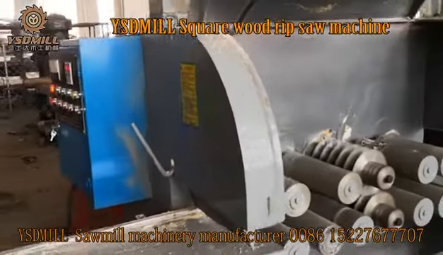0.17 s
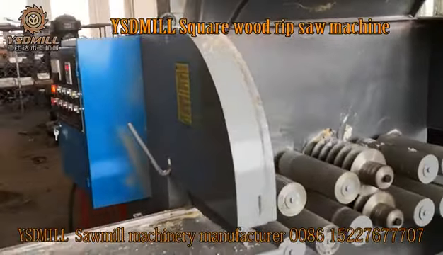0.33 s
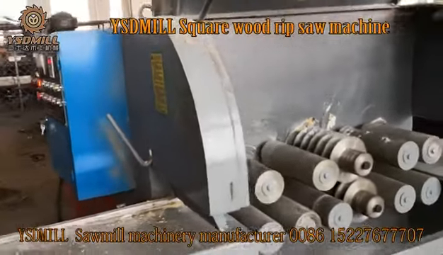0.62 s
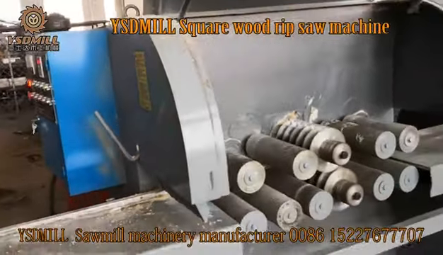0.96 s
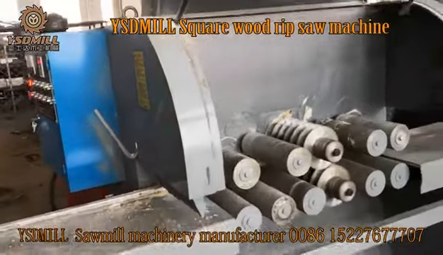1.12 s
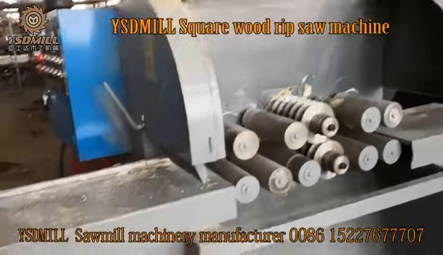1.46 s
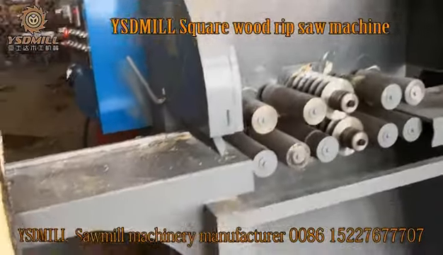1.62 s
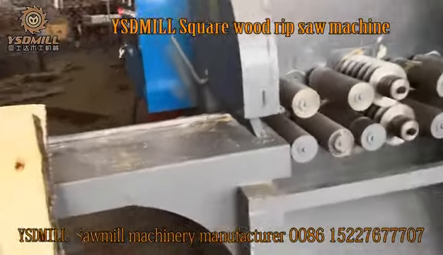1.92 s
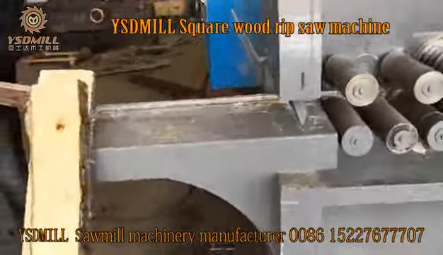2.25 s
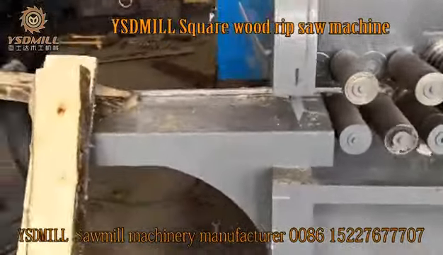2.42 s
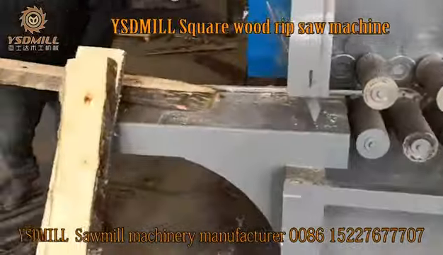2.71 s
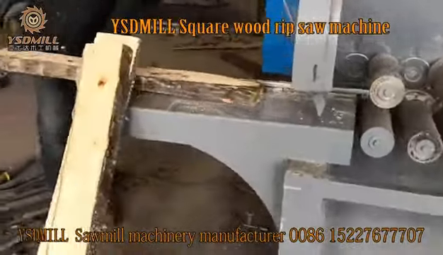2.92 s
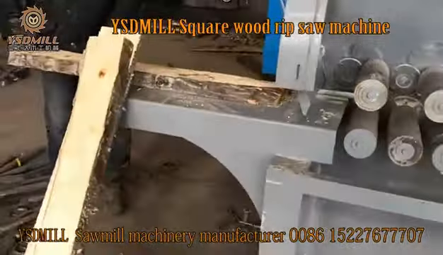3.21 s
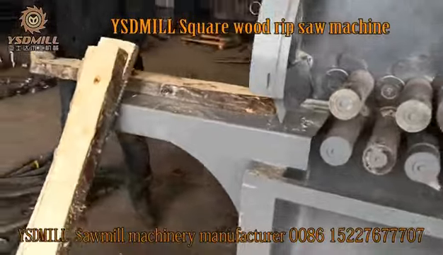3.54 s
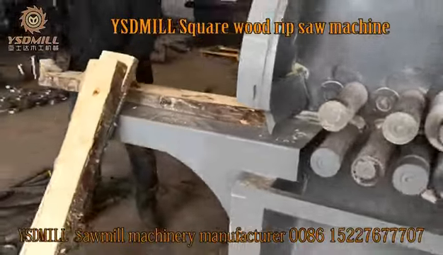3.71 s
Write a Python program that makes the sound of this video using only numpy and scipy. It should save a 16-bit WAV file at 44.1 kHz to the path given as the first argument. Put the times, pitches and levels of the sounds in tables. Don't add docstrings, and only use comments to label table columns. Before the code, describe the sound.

Large woodworking saw runs unloaded, droning and whining, with one small metallic clink midway.

```python
import sys
import numpy as np
from scipy import signal
from scipy.io import wavfile
from scipy.ndimage import uniform_filter1d

SR = 44100
rng = np.random.default_rng(int(sys.argv[2]) if len(sys.argv) > 2 else 0)


def generate_wav(sig):
    pcm = np.round(np.clip(np.atleast_2d(sig).T, -1, 1) * 32767).astype(np.int16)
    wavfile.write(sys.argv[1], SR, pcm)


def natural_amplitude(level_db):
    exponent = np.asarray(level_db, float) / 20
    return 10 ** exponent


N = 170667

DROP_S, BOUNCE_S = 1.509, 1.550


def read(points, at):
    x, value = np.transpose(points)
    return np.interp(at, x, value)


def tracks(points, at):
    x, *lanes = np.transpose(points)
    return [np.interp(at, x, lane) for lane in lanes]


def pair(left_db, right_db):
    return np.array([[left_db], [right_db]])


def drift(rate_hz, shape):
    lowpass = signal.butter(2, rate_hz, fs=SR / 256, output="sos")
    x = signal.sosfilt(lowpass, rng.standard_normal(shape), axis=-1)
    return x / x.std()


def resonate(x, hz, width):
    turn = np.exp(2j * np.pi * np.cumsum(hz * np.ones(N)) / SR)
    r = np.exp(-np.pi * width / SR)
    once = signal.lfilter([1], [1, -r], x / turn)
    y = (turn * signal.lfilter([1], [1, -r], once)).real
    return y / y.std()


def noise_field(channels, patchy_db, swell_db):
    # (centre [Hz], width [Hz], depth [dB], start [s])
    notches = [
        (2920, 140, 10, 2.2),
        (1780, 65, 10, 2.4),
        (1520, 60, 3, 1.6),
    ]
    rise_s = .3
    white = rng.standard_normal((channels, N)) * np.sqrt(SR / 2)
    hz, t, z = signal.stft(white, SR, nperseg=1024, noverlap=768)
    hz = hz[:, None]
    patches = uniform_filter1d(drift(14.7, (len(hz), len(t))), size=9, axis=0)
    for notch_hz, width, depth_db, start in notches:
        dip = np.exp(-((hz - notch_hz) / width) ** 2)
        z = z * natural_amplitude(-depth_db * dip * np.clip((t - start) / rise_s, 0, 1))
    return hz, t, z * natural_amplitude(patchy_db * patches / patches.std() + swell_db * drift(2.13, len(t)))


def sound_of(z):
    return signal.istft(z, SR, nperseg=1024, noverlap=768)[1][:, :N]


def tones(table, same, clean):
    spot_gain_db, spot_length_s = 6.5, 0.62
    out, t = np.zeros((2, N)), np.arange(N) / SR
    share = np.clip(same, 0, 1)
    for hz, width, left_db, right_db, spot_s in table:
        a, b = (resonate(rng.standard_normal(N), hz, width) for _ in range(2))
        halo = np.array([share * a + np.sqrt(1 - share ** 2) * b, a])
        sine = np.sin(2 * np.pi * (hz * t + rng.random()))
        spot_db = spot_gain_db * np.exp(-((t - spot_s) / spot_length_s) ** 2)
        out += natural_amplitude(pair(left_db, right_db) + spot_db) * (halo + clean * sine)
    return out


def hall():
    # (frequency [Hz], level [dB per Hz])
    roar = [(250, -67), (400, -67.5), (950, -68), (1900, -55.5), (2900, -61.5), (3480, -60.5), (3800, -74),
            (7600, -72)]
    # (frequency [Hz], left minus right [dB])
    balance = [(500, 1.5), (1500, -2.5), (2600, 9), (4000, 1), (6000, 2.5), (7300, 6.5)]
    hz, t, z = noise_field(channels=2, patchy_db=2.5, swell_db=0.27)
    side = read(balance, hz) / 2
    return sound_of(z * natural_amplitude(read(roar, hz) + np.array([side, -side])))


def duct():
    return natural_amplitude(-43) * np.array([resonate(rng.standard_normal(N), hz=3840, width=180) for _ in range(2)])


def rumble():
    # (frequency [Hz], level [dB per Hz])
    spectrum = [(20, -82.5), (55, -56.5), (75, -58), (130, -48), (240, -53.5), (350, -61.5), (420, -75),
                (600, -117.5)]
    hz, t, z = noise_field(channels=1, patchy_db=0.5, swell_db=1.26)
    return sound_of(z * natural_amplitude(read(spectrum, hz)))


def hum():
    # (time [s], level [dB])
    levels = [
        (0, -29),
        (.3, -37),
        (2.36, -42),
        (2.53, -22),
        (2.7, -25),
        (2.83, -33),
        (3.06, -24),
        (3.28, -30),
        (3.5, -26),
        (3.87, -30),
    ]
    hum_hz = 128.8
    t = np.arange(N) / SR
    line = np.sin(2 * np.pi * hum_hz * t) + .4 * resonate(rng.standard_normal(N), hum_hz, width=5.7)
    return natural_amplitude(read(levels, t)) * line


def frame_tones():
    # (frequency [Hz], width [Hz], left [dB] (unused), right [dB] (serves both ports), loud spot
    # [s])
    lines = [
        (71, 3.4, -35, -40.5, 1.9),
        (90.8, 5.4, -37, -40, 0.98),
        (167.7, 4.5, -41, -53, 0.42),
        (207.8, 9.1, -37, -38.5, 1.74),
        (249.6, 5, -41, -41, 0.39),
        (351.7, 15, -50, -48.5, 2.2),
    ]
    return tones(lines, same=0.96, clean=0.34)[1]


def gear_tones():
    # (frequency [Hz], width [Hz], left [dB], right [dB], loud spot [s])
    lines = [
        (624, 20, -57.5, -51, 3.3),
        (830, 22, -56, -48, 2.2),
        (1297, 5, -47, -45.5, 1.2),
        (1346, 6, -52, -50, .4),
        (2462, 26, -39, -30.5, 1),
    ]
    return tones(lines, same=.6, clean=.4)


def belt():
    # (start [Hz], sag [Hz/s], width [Hz], left [dB], right [dB])
    lines = [
        (1396, -.6, 5, -29.5, -35.5),
        (1673, 7.5, 9, -37, -37),
    ]
    # (time [s], lower line [dB], upper line [dB])
    seam = [(0, 3, 2), (.13, -8, 2), (.4, 5, 1), (.52, -8, -7), (.85, 2, -3), (1.05, -9, 2), (1.25, 3, -8),
            (1.48, -8, -9), (1.72, 4, -5), (1.95, 0, 1), (2.27, -11, -7), (2.45, -2, 4), (2.75, -3, 4),
            (3, -8, 2), (3.2, -6, 1), (3.38, -13, -12), (3.6, 1, -8), (3.87, -2, -6)]
    out, t = np.zeros((2, N)), np.arange(N) / SR
    for load_db, (start_hz, sag, width, left_db, right_db) in zip(tracks(seam, t), lines):
        hz = start_hz - sag * t
        sine = np.sin(2 * np.pi * np.cumsum(hz) / SR)
        line = sine + .25 * resonate(rng.standard_normal(N), hz, width)
        out += natural_amplitude(pair(left_db, right_db) + load_db) * line
    return out


def squeal():
    # (time [s], pitch [Hz], right [dB], left minus right [dB], overtone [dB])
    course = [(0, 3726, -39.5, -4, -12), (0.302, 3442, -24, -16.5, -14), (0.699, 3477, -35, -5, -7),
              (0.898, 3625, -47, 1.5, -12), (1.401, 3522, -31, -0.5, -7), (1.618, 3624, -45.5, 8, 1.5),
              (1.71, 3540, -24, 0, -16.5), (1.801, 3600, -65, -26, 15.5), (2.152, 3560, -39.5, 1, -4),
              (2.401, 3548, -29, -7, -11.5), (2.75, 3517, -22.5, -6, -14), (3.052, 3565, -33, 3.5, -6),
              (3.401, 3526, -33, -4, -7.5), (3.87, 3540, -45, 9.5, 0.5)]
    width, side_hz, side_db = 45, 55, -4.5
    hz, db, left_db, over_db = tracks(course, np.arange(N) / SR)
    gusts = natural_amplitude(4. * np.tanh(np.repeat(drift(10., N // 256 + 1), 256)[:N]))
    out = []
    for pan_db, over_pan_db in ((left_db, 4), (0, 0)):
        a, b, c = rng.standard_normal((3, N))
        whistle = resonate(a, hz, width) + natural_amplitude(side_db) * resonate(b, hz + side_hz, width)
        overtone = resonate(c, 2 * hz, 210.0) * gusts
        out.append(natural_amplitude(db + pan_db) * whistle + natural_amplitude(db + over_db + over_pan_db) * overtone)
    return np.array(out)


def knocks():
    # (low edge [Hz], high edge [Hz])
    blow_band = [1700, 3800]
    click_db = [
        [-14],
        [0],
    ]
    knock_db, knock_t60 = -24, .04
    click_s, click_hz, click_width_s = 1.557, 2460, .0005
    t = np.arange(N) / SR
    shape = sum((t > s) * natural_amplitude(knock_db - 60 * np.maximum(t - s, 0) / knock_t60) for s in (DROP_S, BOUNCE_S))
    bandpass = signal.butter(2, blow_band, "bandpass", fs=SR, output="sos")
    blow = signal.sosfilt(bandpass, rng.standard_normal((2, N)))
    pulse = np.exp(-((t - click_s) / click_width_s) ** 2) * np.cos(2 * np.pi * click_hz * (t - click_s))
    return shape * blow / blow.std() + natural_amplitude(np.array(click_db)) * pulse


def steel():
    mode_hz = [1190, 1880, 2729, 3110, 3540, 4791, 5276, 5600, 5896, 5973, 6190, 7149, 7237]
    # (left [dB], right [dB], t60 [s], bounce [dB])
    modes = [(-22, -24, .14, -8), (-15, -17, .12, 4), (-10, -13, .1, -2), (-25, -25, .14, -3),
             (-18, -19, .1, 0), (-20, -22, .14, -8), (-26, -38, .08, -10), (-19, -30, .3, -6),
             (-8, -29, .36, -13), (-16, -34, .6, -1), (-32, -50, .15, 4), (-45, -55, .3, 19),
             (-42, -55, .3, 22)]
    strike_s, port_lag_s = .005, .000106
    damp_db, damp_s = -9, .02
    rest_s, settle_s = 1.63, .06
    out, first = np.zeros((2, N)), round(DROP_S * SR)
    now = np.arange(first, first + SR // 4) / SR
    damping_db = damp_db * np.clip((now - BOUNCE_S) / damp_s, 0, 1)
    settling = np.clip(1 - (now - rest_s) / settle_s, 0, 1)
    for hz, (left_db, right_db, t60, bounce_db) in zip(mode_hz, modes):
        for start, db in ((DROP_S, damping_db), (BOUNCE_S, bounce_db)):
            t = np.maximum(now - start - np.array([[0], [port_lag_s]]), 0)
            ring = np.minimum(t / strike_s, 1) * natural_amplitude(db - 60 * t / t60) * np.sin(2 * np.pi * hz * t)
            out[:, first:first + len(now)] += natural_amplitude(pair(left_db, right_db)) * ring * settling
    return out


def machine():
    # (time [s], blade phase lead [rad], casing phase lead [rad], blade hump [Hz], upper blades left [dB])
    turn = [
        (0, 2.85, 0.62, 2670, 5),
        (.6, 2.7, 0.54, 2550, -5.5),
        (1, 1.6, 2.3, 2550, 1),
        (1.4, 1.5, 1.5, 2550, -1),
        (1.799, 2.54, 1.2, 2550, 7.5),
        (2.2, 3.2, 1.9, 2550, 3),
        (2.6, 3.0, 4, 2430, 7.5),
        (3, 3.4, 2.2, 2273, 4),
        (3.87, 3.6, 3, 2400, 5.5),
    ]
    # (frequency [Hz], level [dB per Hz])
    casing_spectrum = [(520, -100.5), (620, -67.5), (950, -72), (1250, -60.5), (1400, -59.5), (1510, -66.5),
                       (1720, -59.5), (2000, -83)]
    # (frequency from hump [Hz], level [dB per Hz])
    blade_spectrum = [(-1000, -73), (-500, -51), (-150, -46.5), (-2, -43), (165, -46), (515.5, -51),
                      (904, -57), (1308.5, -89.5)]
    blades_left_db, casing_left_db = -16, -6.5
    hz, t, z = noise_field(channels=2, patchy_db=1.6, swell_db=.35)
    blade_rad, casing_rad, hump_hz, upper_db = tracks(turn, t)
    rolloff_db = .05 * np.maximum(hz - 3550, 0)
    blades = z[0] * natural_amplitude(read(blade_spectrum, hz - hump_hz) - rolloff_db)
    casing = z[1] * natural_amplitude(read(casing_spectrum, hz))
    upper = np.clip((hz - 2550) / 170, 0, 1)
    left = blades * natural_amplitude(blades_left_db + upper_db * upper) + casing * natural_amplitude(casing_left_db)
    right = blades * np.exp(1j * blade_rad) + casing * np.exp(1j * casing_rad * hz / 1700)
    return sound_of(np.array([left, right]))


def scene():
    frame = rumble() + hum() + frame_tones()
    drives = gear_tones() + belt() + squeal()
    return hall() + duct() + frame + drives + knocks() + steel() + machine()


def masked(x):
    band_bins, low_bin, top_hz = 4, 30, 7590
    mask_db, spread_db, dip_db, jitter_db = 10, 2, 6., 2.
    mid_side = np.array([x[0] + x[1], x[0] - x[1]]) / 2
    hz, t, z = signal.stft(mid_side, SR, nperseg=2048, noverlap=1024, window="cosine")
    power = uniform_filter1d(abs(z[:, :-1]) ** 2, size=2, axis=2)
    power = power.reshape(2, -1, band_bins, len(t)).mean(2)
    db = 10 * np.log10(power + 1e-20)
    loudest = db.max(0)
    near = np.max([np.roll(loudest, k, 0) - spread_db * abs(k) for k in range(-3, 3)], 0) - mask_db
    wide = uniform_filter1d(loudest, size=7, axis=0) - dip_db
    mood = uniform_filter1d(rng.standard_normal(db.shape[1:]), size=2, axis=0)
    mood = uniform_filter1d(mood, size=3, axis=1)
    threshold = np.maximum(near, wide) + jitter_db * mood / mood.std()
    keep = np.repeat(db > threshold, band_bins, axis=1)
    keep[0, :low_bin] = keep[1, 14:low_bin] = True
    z[:, :-1] *= keep * (hz[:-1, None] < top_hz)
    mid, side = signal.istft(z, SR, nperseg=2048, noverlap=1024, window="cosine")[1][:, :N]
    return np.array([mid + side, mid - side])


def low_pass(x):
    return signal.sosfilt(signal.butter(12, 8610, fs=SR, output="sos"), x)


def record(dry):
    mix = np.clip(masked(dry), -1.0, 1.0)
    return low_pass(mix)


dry = scene()
out = record(dry)
generate_wav(out)
```